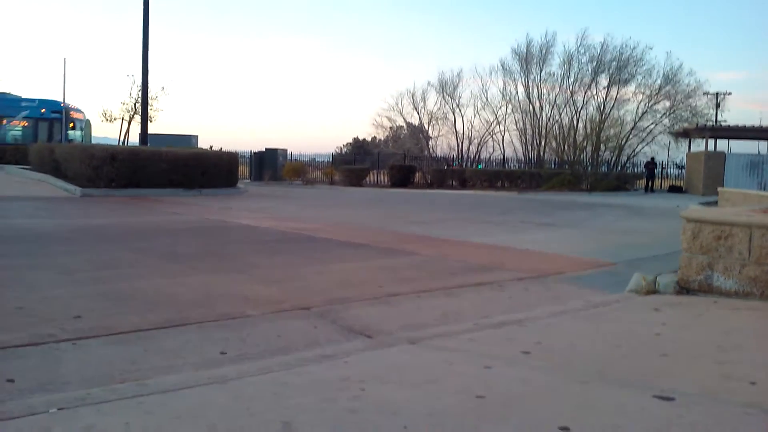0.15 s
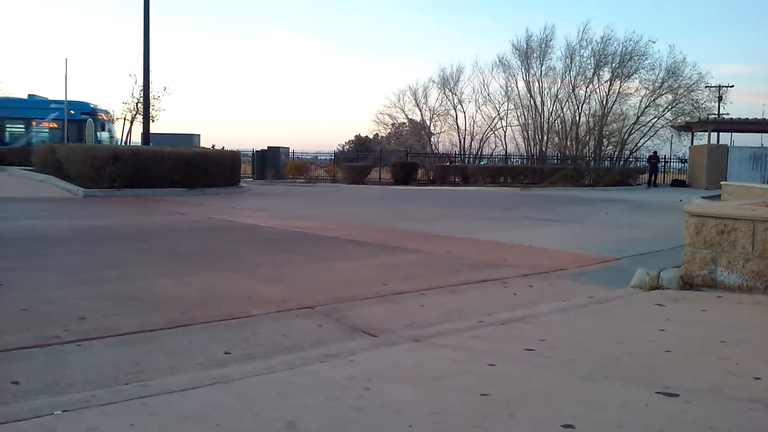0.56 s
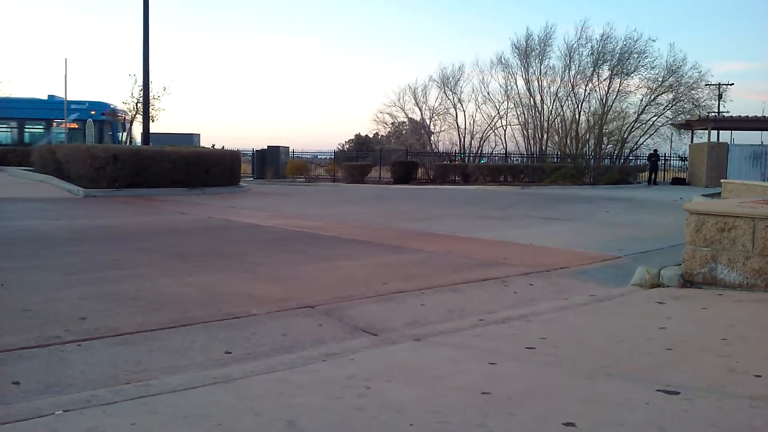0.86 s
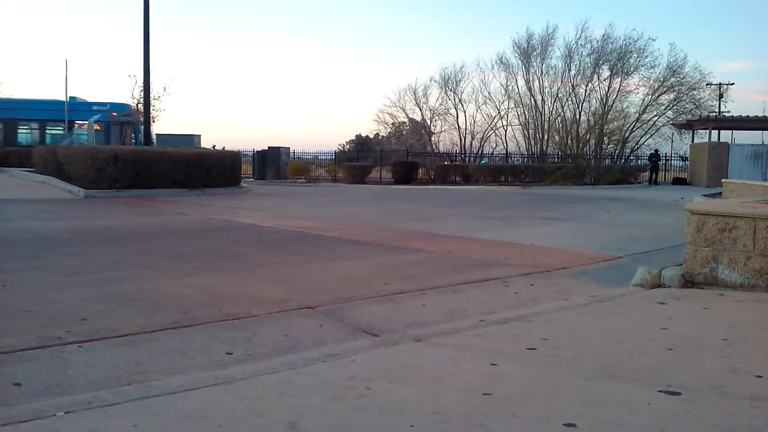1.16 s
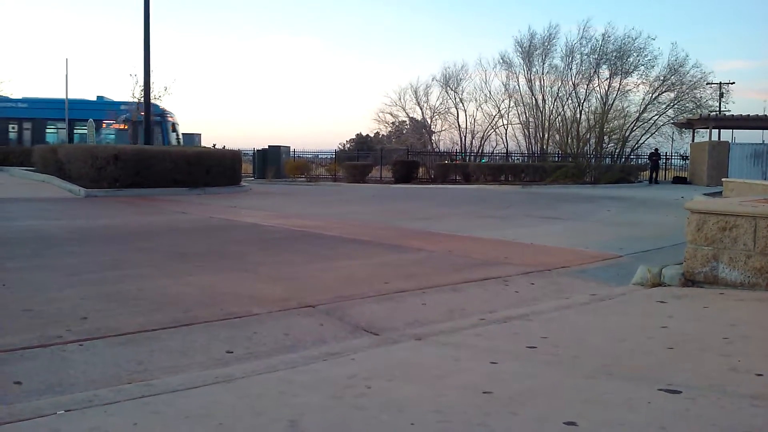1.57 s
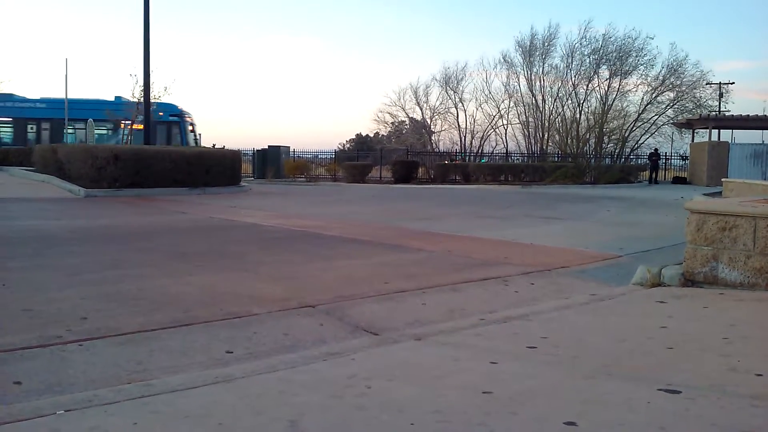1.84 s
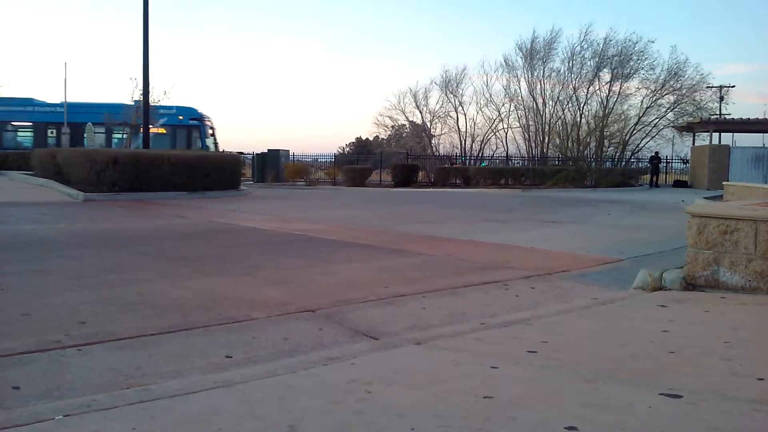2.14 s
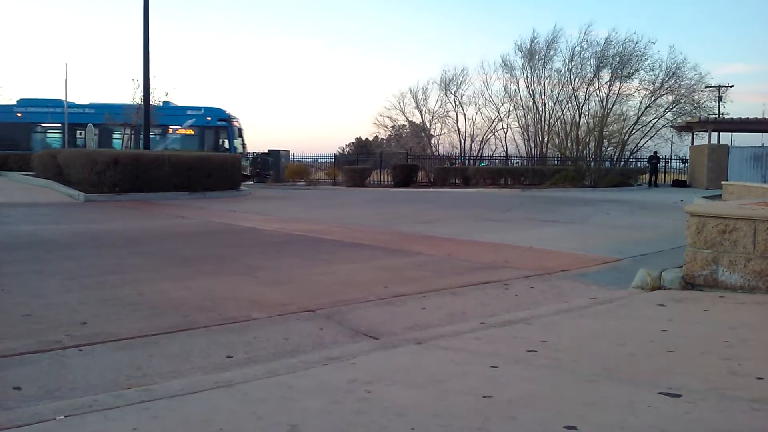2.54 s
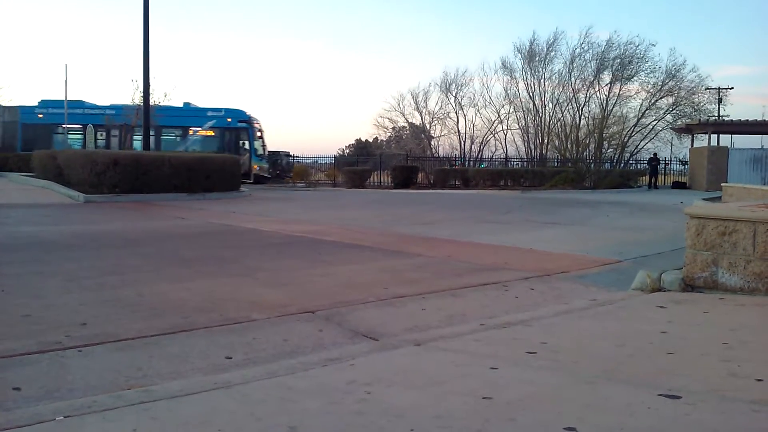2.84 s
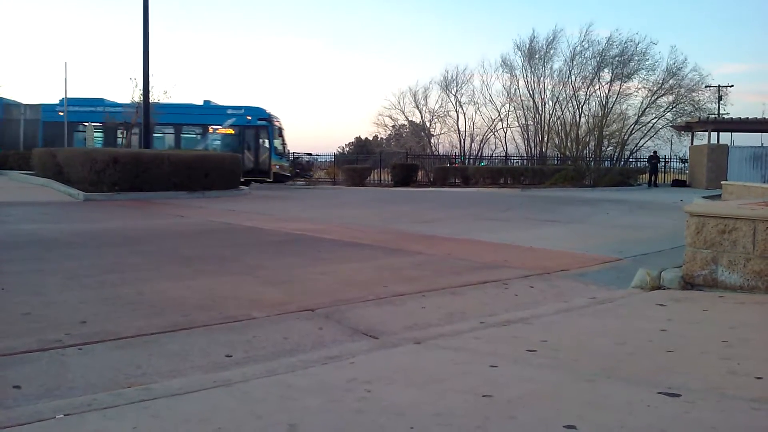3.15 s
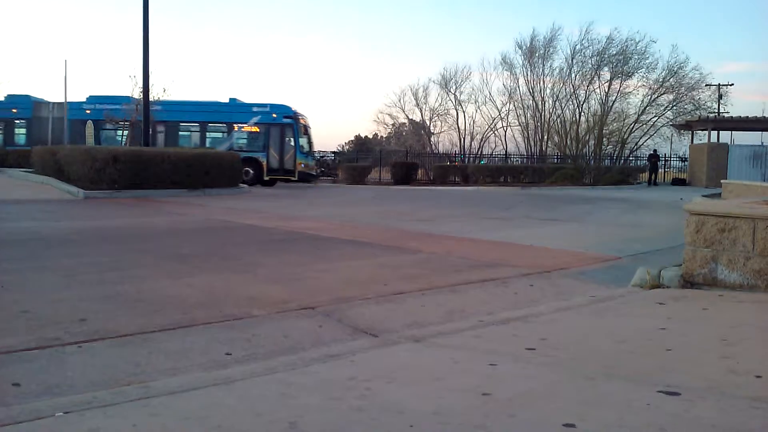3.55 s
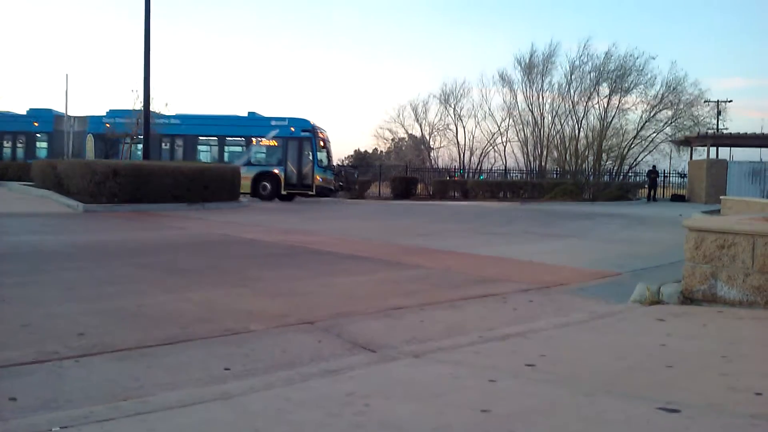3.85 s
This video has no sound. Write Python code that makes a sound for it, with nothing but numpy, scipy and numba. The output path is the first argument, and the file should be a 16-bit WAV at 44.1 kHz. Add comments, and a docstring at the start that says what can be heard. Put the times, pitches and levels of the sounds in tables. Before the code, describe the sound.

A slow bus hums in the distance outdoors, with a thin air leak and faintly singing brakes, then releases one brief hiss of air. Uneven wind buffets the microphone up close, with a few sharp cracks, strongest near the end.

```python
"""A bus creeps across an open lot some way off, its engine humming, and lets out one short air-brake hiss.
The hiss is jet noise, dying as the pressure drops. A thin leak hisses throughout, valves spit now and
then, and friction sets the brakes singing faintly. Close by, turbulent gusts of wind
buffet the microphone, and the hardest eddies crack against it."""
import sys
import numpy as np
from scipy import signal
from scipy.fft import rfft, irfft
from scipy.io import wavfile
from scipy.ndimage import uniform_filter1d, minimum_filter1d
from numba import njit

SR = 44100
rng = np.random.default_rng(int(sys.argv[2]) if len(sys.argv) > 2 else 0)


def generate_wav(signal):
    """Clip the signal to [-1, 1] and save it as 16-bit WAV at the path in sys.argv[1]."""
    frames = np.transpose(np.atleast_2d(signal))
    scaled = np.clip(frames, -1, 1) * 32767
    pcm = np.round(scaled).astype(np.int16)
    wavfile.write(sys.argv[1], SR, pcm)


N = 176400

# Engine and tyre noise. Each row: frequency in Hz, relative level in dB.
ENGINE_SPECTRUM = [(30, -27), (90, -12), (200, 6.5), (420, -4), (620, -1), (1000, -12), (1500, -17.5),
                   (2200, -21.5), (3000, -27), (4000, -32.5), (6000, -33.5), (8100, -35), (9600, -52.5),
                   (15500, -39.5)]
# Loudness of that noise. Each row: time in seconds, level in dB.
ENGINE_LEVEL = [(0, -49.5), (1.2, -45), (2, -43.5), (2.8, -44), (3.4, -40), (4, -46.5)]
# Steady whines of the bus. Each row: frequency in Hz, level in dB.
ENGINE_WHINES = [(1450, -65), (725, -60), (612, -60)]
# Turbulence before it is low-passed. Each row: frequency in Hz, relative level in dB.
WIND_SPECTRUM = [(15, -9), (30, -17), (60, -2.5), (115, -0.5), (230, -3), (450, -5), (900, -6.5),
                 (1800, -12.5), (4000, -3)]
# The breeze between gusts. Each row: time in seconds, level in dB.
BREEZE_LEVEL = [(0, -48.5), (.18, -52.5), (.23, -26), (.43, -38), (.9, -30), (1.1, -34), (1.26, -39),
                (1.4, -30.5), (1.7, -26.5), (2.1, -32), (2.7, -38), (3, -29.5), (3.15, -38.5),
                (3.42, -22.5), (3.55, -32), (3.67, -40.5), (3.79, -40.5), (3.88, -19), (4, -49)]
# Gusts. Each row: peak time and nominal half length in seconds, level in dB, rumble's upper edge in Hz.
WIND_GUSTS = [(0.233, 0.0099, -13.5, 550), (0.267, 0.0055, -19, 464), (0.364, 0.0058, -14, 443),
              (0.411, 0.0058, -21.5, 324), (0.469, 0.004, -14, 540), (0.547, 0.092, -22, 517),
              (0.57, 0.0074, -9, 534), (0.613, 0.0052, -13, 660), (0.643, 0.016, -16, 525),
              (0.675, 0.011, -14.5, 694), (0.698, 0.01, -15, 547), (0.758, 0.016, -16, 474),
              (0.802, 0.016, -16.5, 423), (0.858, 0.016, -15, 500), (0.899, 0.013, -12.5, 830),
              (0.991, 0.012, -23.5, 770), (1.037, 0.0087, -21.5, 386), (1.144, 0.0056, -27, 274),
              (1.392, 0.015, -22.5, 497), (1.431, 0.007, -18, 515), (1.452, 0.0072, -21.5, 440),
              (1.527, 0.016, -24.5, 485), (1.564, 0.0042, -11, 513), (1.614, 0.01, -13, 590),
              (1.643, 0.011, -12, 514), (1.685, 0.017, -14.5, 510), (1.773, 0.0047, -18.5, 392),
              (1.793, 0.011, -23.5, 336), (1.856, 0.016, -21.5, 435), (1.908, 0.019, -14.5, 294),
              (1.939, 0.02, -23, 335), (2.015, 0.0074, -18, 370), (2.13, 0.0044, -18, 203),
              (2.245, 0.01, -16.5, 560), (2.416, 0.011, -21, 198), (2.472, 0.0064, -20.5, 570),
              (2.597, 0.0028, -11.5, 385), (2.876, 0.011, -10.5, 360), (2.904, 0.023, -12, 440),
              (2.996, 0.0051, -22.5, 238), (3.053, 0.0084, -23, 400), (3.077, 0.0079, -24.5, 414),
              (3.179, 0.0053, -22.5, 297), (3.233, 0.0078, -23.5, 263), (3.264, 0.0036, -8, 454),
              (3.29, 0.0097, -6.5, 230), (3.313, 0.0036, -12, 560), (3.342, 0.013, -18.5, 410),
              (3.382, 0.0053, -8.5, 340), (3.403, 0.0092, -10, 520), (3.456, 0.015, -11.5, 250),
              (3.847, 0.012, -17, 370), (3.887, 0.021, -13, 890), (3.92, 0.0064, -4.5, 530),
              (3.948, 0.0083, -5.5, 470), (3.983, 0.017, -8.5, 380)]
# Hiss of the leak. Each row: frequency in Hz, relative level in dB.
LEAK_SPECTRUM = [(2000, -2), (3000, -11.5), (4200, -14), (5600, -9.5), (8200, -0.5), (9300, -8),
                 (11500, -11), (13000, -17), (15500, -20)]
# Loudness about which the leak flickers. Each row: time in seconds, level in dB.
LEAK_TREND = [(0, -54), (.04, -53.5), (.4, -55), (.56, -55), (.6, -59), (.86, -55), (.91, -62),
              (1.5, -62.5), (2.95, -59), (3.15, -66), (4, -57.5)]
# Brake resonances. Each row: peak time and half length in seconds, pitch and width in Hz, relative dB.
BRAKE_TONES = [(.3, .3, 2970, 200, -68), (.2, .3, 2210, 100, -70), (3.13, .25, 2190, 130, -60),
               (3.65, .35, 2170, 140, -65), (3.75, .1, 4650, 700, -64), (2.05, .3, 5300, 600, -74)]
# The hardest eddies. Each row: time in seconds, peak in dB before filtering, upper edge in Hz.
EDDY_CRACKS = [(.233, -11, 1040), (0.471, -0.5, 960), (.5765, -1, 1860), (0.609, -9.5, 1460),
               (0.676, -4.5, 1030), (0.8873, 19, 1680), (0.905, 0.5, 1500), (0.912, -8, 1320),
               (1.562, -11, 870), (1.615, -6.5, 900), (2.243, -15.5, 900), (2.87, -4.5, 920),
               (2.913, -2.5, 1090), (3.288, 3.5, 1510), (3.315, -6, 970), (3.38, 1, 960), (3.404, -9, 1150),
               (3.919, 4.5, 1400), (3.942, 2, 1230), (3.948, 0, 1190), (3.973, 0.5, 1420), (3.991, 2, 950)]
# Valve spits. Each row: start in seconds, level in dB, decay in seconds, ring in Hz, ring in relative dB.
VALVE_SPITS = [(0.45, -50, 0.05, 2730, 4.5), (1.556, -53.5, 0.013, 4600, -3.5),
               (1.587, -56, 0.011, 6800, -7), (2.22, -57.5, 0.14, 2460, -1.5), (2.403, -50, 0.047, 5700, 3),
               (3.419, -43, 0.035, 3340, -5), (3.902, -50, 0.004, 3560, 10.5)]
# Hiss of a spit. Each row: frequency in Hz, relative level in dB.
SPIT_SPECTRUM = [(1500, -7.5), (2600, 0), (3500, -2), (4300, -15.5), (4950, -2), (6800, -7.5), (8600, 5),
                 (9300, -9.5), (15000, -35)]
# The air-brake jet before it is high-passed. Each row: frequency in Hz, relative level in dB.
JET_SPECTRUM = [(1200, -8.5), (1700, -5), (2400, -3.5), (2700, 0), (2960, 3.5), (3350, -4), (4600, -3),
                (6600, -7), (8000, -3), (9500, -9.5), (12500, -20.5), (15500, -28)]


def undb(db):
    """Amplitude grows tenfold for every 20 dB."""
    return 10 ** (np.asarray(db) / 20)


def unit(x):
    """Normalisation scales a signal to rms 1."""
    return x / np.sqrt(np.mean(x ** 2))


def curve(rows):
    """Linear interpolation joins (seconds, value) rows."""
    return np.interp(np.arange(N) / SR, *np.array(rows).T)


def noise(spectrum):
    """Spectral shaping colours white noise by (Hz, dB) rows; the result has rms 1."""
    hz, db = np.array(spectrum).T
    f = np.maximum(np.fft.rfftfreq(N, 1 / SR), 1)
    gain = undb(np.interp(np.log(f), np.log(hz), db))
    return unit(irfft(rfft(rng.standard_normal(N)) * gain, N))


def ring(hz, width_hz):
    """A resonance driven by noise passes one narrow band; the result has rms 1."""
    detuning = (np.fft.rfftfreq(N, 1 / SR) - hz) / (width_hz / 2)
    return unit(irfft(rfft(rng.standard_normal(N)) / (1 + detuning ** 2), N))


def cut(x, hz, kind, order=2):
    """A maximally flat filter passes the low or the high side of hz."""
    return signal.sosfilt(signal.butter(order, hz, kind, fs=SR, output="sos"), x)


@njit
def moving_lowpass(x, hz):
    """Two integrators in a feedback loop form a low-pass whose edge can move."""
    y, band_state, low_state = np.empty(len(x)), 0., 0.
    for i in range(len(x)):
        g = np.tan(np.pi * hz[i] / SR)
        band = (band_state + g * (x[i] - low_state)) / (1 + g * (g + 1.3))
        y[i] = low_state + g * band
        band_state, low_state = 2 * band - band_state, 2 * y[i] - low_state
    return y


def engine():
    """Engine and tyres radiate broadband noise that grows as the bus nears, with faint narrowband whines."""
    hum = noise(ENGINE_SPECTRUM) * undb(curve(ENGINE_LEVEL))
    return hum + sum(undb(db) * ring(hz, width_hz=16) for hz, db in ENGINE_WHINES)


def wind(t):
    """Turbulent pressure rumbles on the microphone; gusts swell it and widen its spectrum upward."""
    breeze_edge_hz, fine_hz, burst_share = 211, 361, 0.88
    power = undb(curve(BREEZE_LEVEL)) ** 2
    weighted_edge = power * breeze_edge_hz
    for at, half, db, hz in WIND_GUSTS:
        width = half * np.where(t < at, 0.71, 1.286)  # quick rise, slower fall
        gust = undb(db) ** 2 * np.exp(-((t - at) / width) ** 2)
        power, weighted_edge = power + gust, weighted_edge + gust * hz
    edge_hz = weighted_edge / power
    eddies = moving_lowpass(moving_lowpass(noise(WIND_SPECTRUM), edge_hz), edge_hz)
    # Intermittency: small eddies burst on the crests of large ones.
    large = cut(cut(eddies, fine_hz, "low")[::-1], fine_hz, "low")[::-1]  # zero phase
    crests = unit(cut(large ** 2, fine_hz / 2, "low"))
    eddies = large + (eddies - large) * unit(1 - burst_share + burst_share * crests)
    # The eddies are evened out over 34 ms, so breeze and gusts set the level.
    span = int(0.034 * SR)
    eddy_power = uniform_filter1d(uniform_filter1d(eddies ** 2, span), span // 2)
    return eddies / np.sqrt(eddy_power + 1e-12) * np.sqrt(power)


def leak():
    """Air escaping through a small gap turns turbulent: a thin hiss whose level flickers."""
    flicker_db = 1.76 * unit(cut(rng.standard_normal(N), hz=11.3, kind="low"))
    return noise(LEAK_SPECTRUM) * undb(curve(LEAK_TREND) + flicker_db)


def brake_song(t):
    """Friction of the pads excites narrow resonances that swell and fade."""
    out = 0
    for at, half, hz, width_hz, db in BRAKE_TONES:
        swell = 1 / (1 + ((t - at) / half) ** 2)
        out = out + ring(hz, width_hz) * undb(db) * swell
    return out * undb(4)


def wind_cracks(t):
    """The hardest eddies strike as pressure impulses: a rounded thump, with a thin snap on the sharpest."""
    spike_s, snap_hz = 0.00032, 2065
    out = 0
    for at, db, hz in EDDY_CRACKS:
        spike = undb(db) * np.exp(-np.abs(t - at) / spike_s)
        thump = cut(spike, hz, "low", order=4)
        snap = spike * (hz / snap_hz) ** 10
        out = out + thump + snap
    return cut(out, hz=300, kind="high", order=1)


def valve_spits(t):
    """Each valve opens with a pop, and its decaying puff of air excites the resonance of the port."""
    pop_db, pop_s = -9, 0.0019
    out = 0
    for at, db, decay_s, hz, ring_db in VALVE_SPITS:
        spit = noise(SPIT_SPECTRUM) + undb(ring_db) * ring(hz, width_hz=540)
        age = np.abs(t - at)
        envelope = np.exp(-age / decay_s) + undb(pop_db) * np.exp(-age / pop_s)
        out = out + spit * undb(db) * (t > at) * envelope
    return out


def air_brake(t):
    """A turbulent jet swells, holds and dies as the pressure drops; the treble comes and goes first."""
    start_s, rise_s, hold_s = 2.399, 0.049, 0.12
    closes_after_s, closing_db_per_s = 0.33, 52
    jet = rfft(unit(cut(noise(JET_SPECTRUM), hz=1460, kind="high", order=4)))
    f, out = np.fft.rfftfreq(N, 1 / SR), 0
    centres_hz = np.geomspace(1500, 15000, 6)
    for hz, share in zip(centres_hz, np.eye(len(centres_hz))):
        band = irfft(jet * np.interp(f, centres_hz, share), N)
        lag_s = 0.042 * max(1 - hz / 4400, 0)  # bands below 4400 Hz start late
        age = t - start_s - lag_s
        draining_db_per_s = 49.5 + 13 * hz / 8800
        fall_db = draining_db_per_s * np.maximum(age - hold_s, 0)
        fall_db += closing_db_per_s * np.maximum(age - closes_after_s, 0)
        out = out + band * np.clip(age / rise_s, 0, 1) * undb(-fall_db)
    return out * undb(-31.5)


def scene():
    """By superposition, the near wind and the distant bus add in one channel."""
    t = np.arange(N) / SR
    buffeting = wind(t) + wind_cracks(t)
    bus = air_brake(t) + leak() + valve_spits(t) + brake_song(t) + engine()
    return (buffeting + bus)[None]


def record(dry):
    """A limiter turns down peaks near full scale, and a steep low-pass cuts the top."""
    ceiling, top_hz, span = 0.95, 15700, SR // 200
    gain = minimum_filter1d(1 / np.maximum(np.abs(dry) / ceiling, 1), 2 * span)
    limited = dry * uniform_filter1d(uniform_filter1d(gain, span), span)
    return signal.sosfilt(signal.ellip(10, .1, 80, top_hz, fs=SR, output="sos"), limited)


dry = scene()
out = record(dry)
generate_wav(out)
```